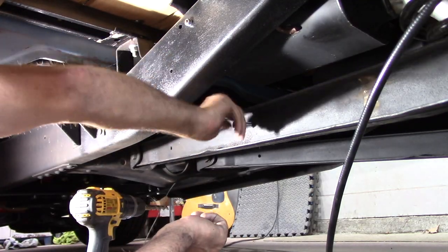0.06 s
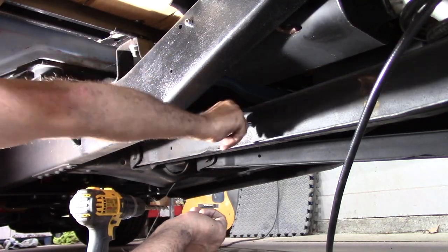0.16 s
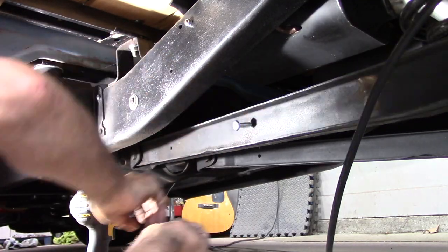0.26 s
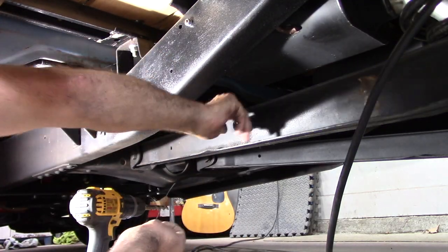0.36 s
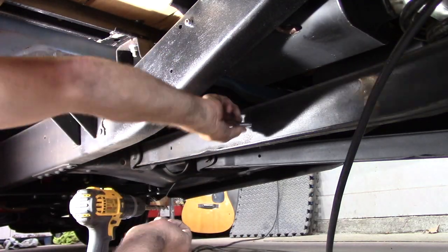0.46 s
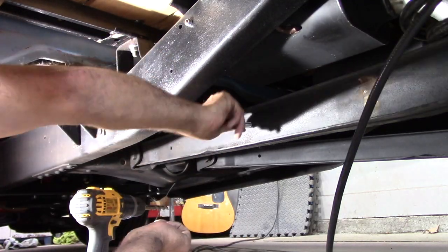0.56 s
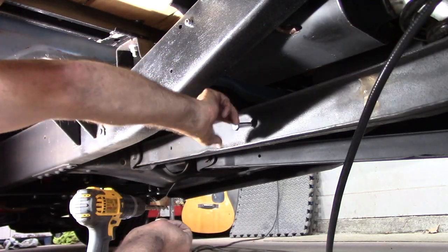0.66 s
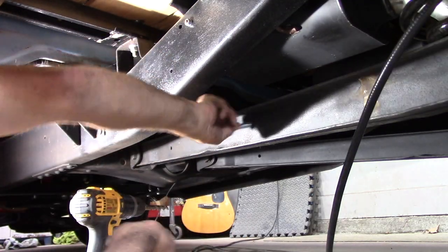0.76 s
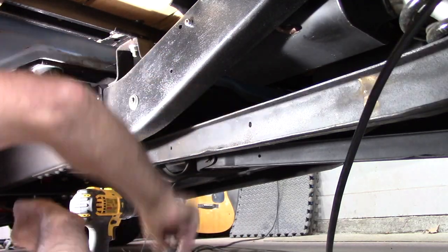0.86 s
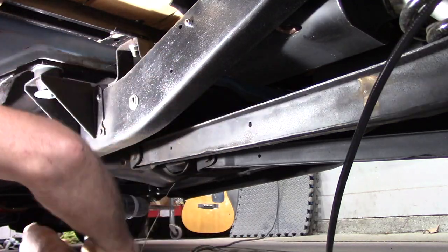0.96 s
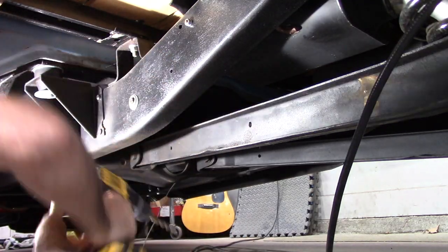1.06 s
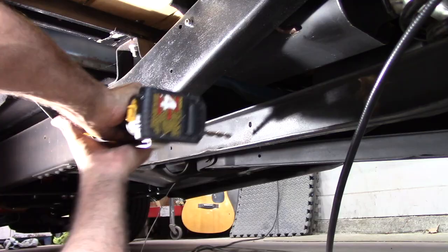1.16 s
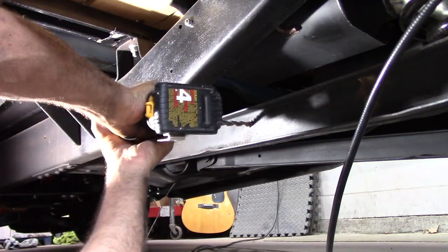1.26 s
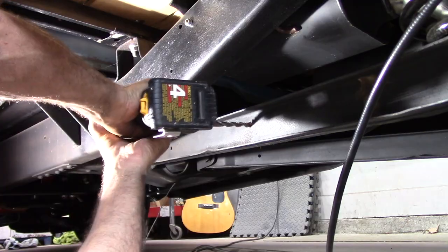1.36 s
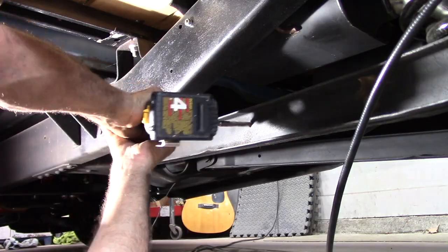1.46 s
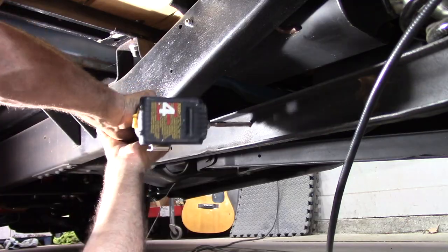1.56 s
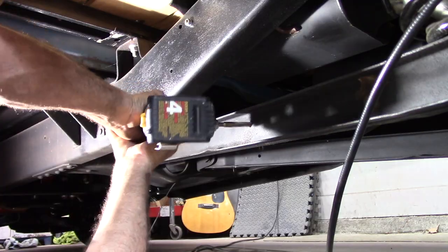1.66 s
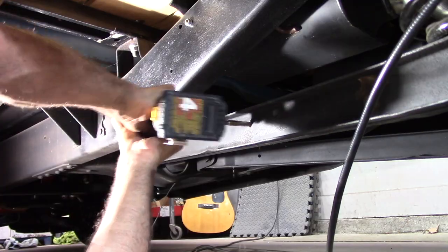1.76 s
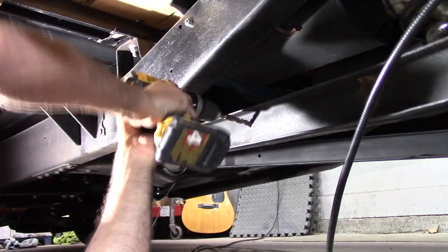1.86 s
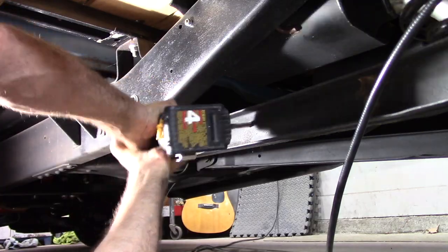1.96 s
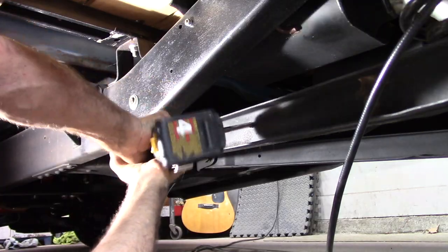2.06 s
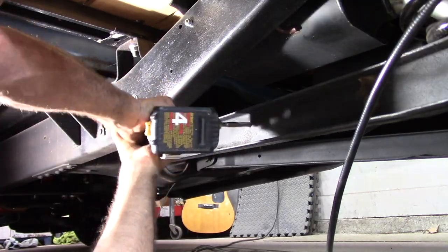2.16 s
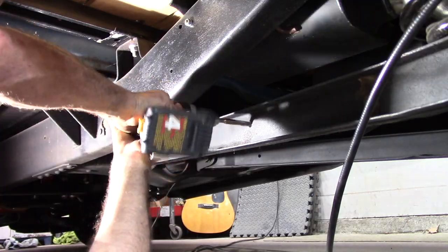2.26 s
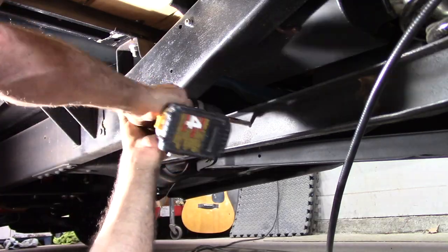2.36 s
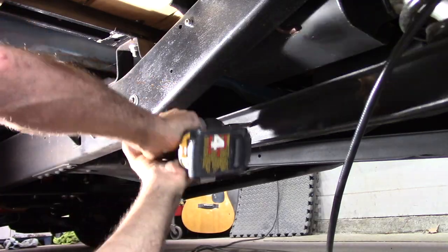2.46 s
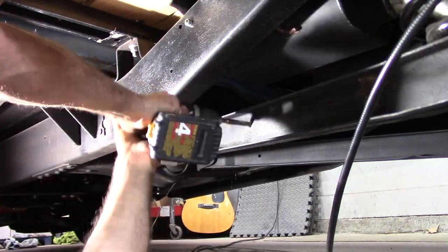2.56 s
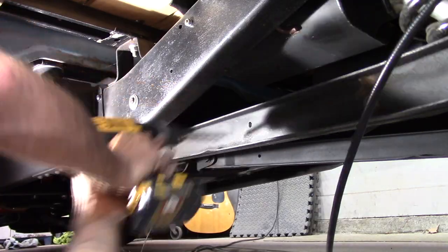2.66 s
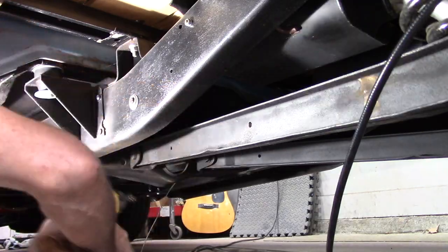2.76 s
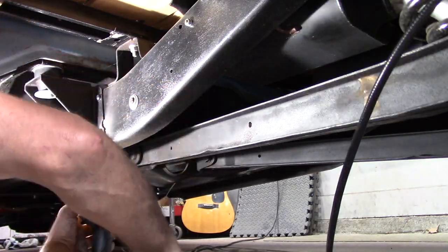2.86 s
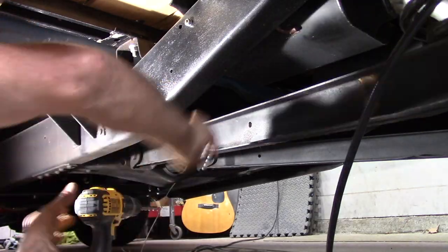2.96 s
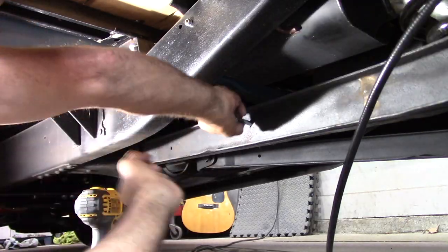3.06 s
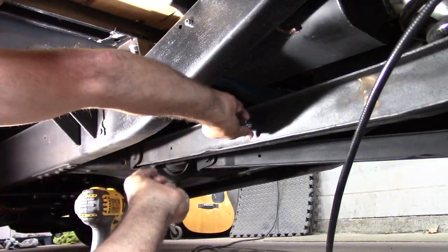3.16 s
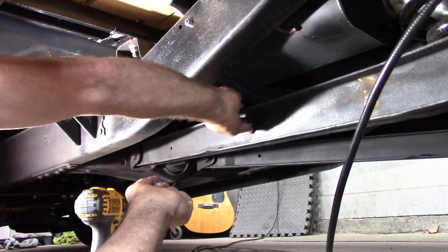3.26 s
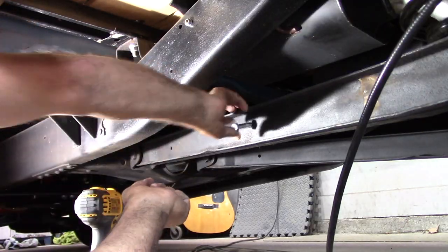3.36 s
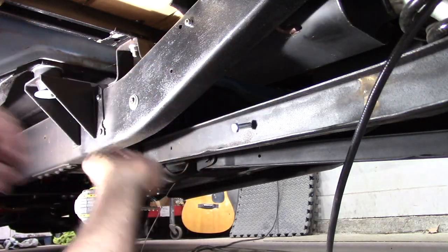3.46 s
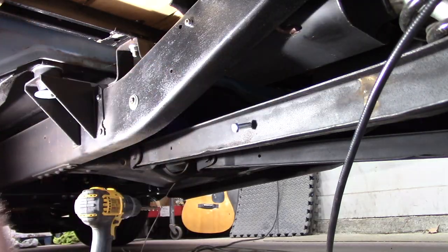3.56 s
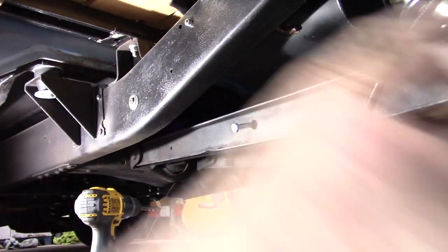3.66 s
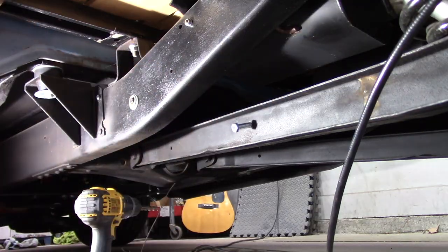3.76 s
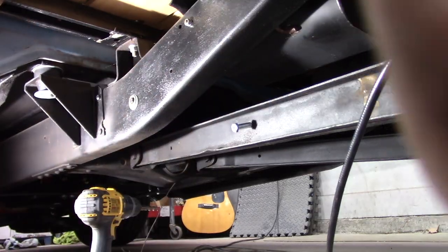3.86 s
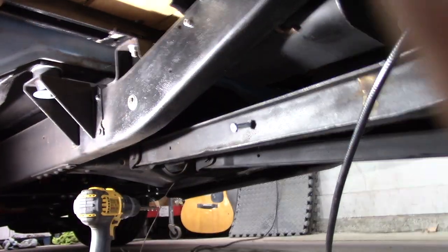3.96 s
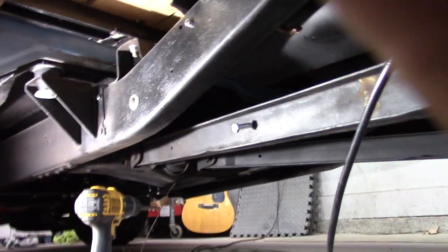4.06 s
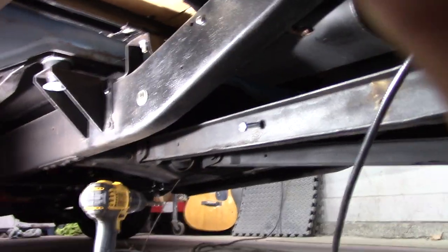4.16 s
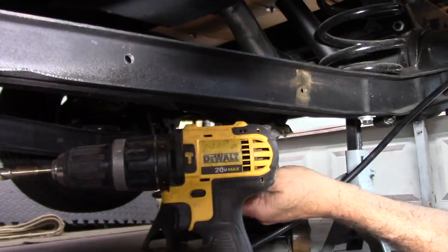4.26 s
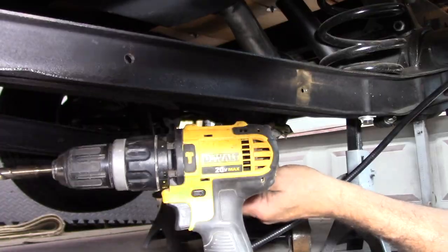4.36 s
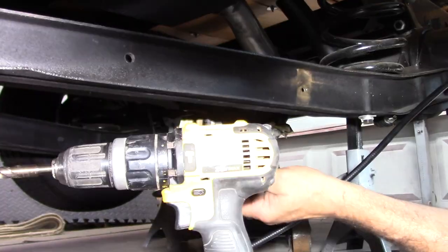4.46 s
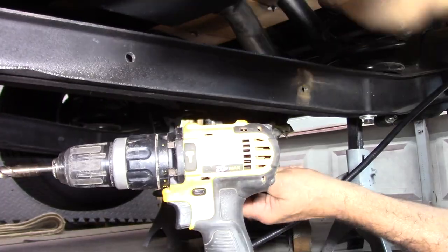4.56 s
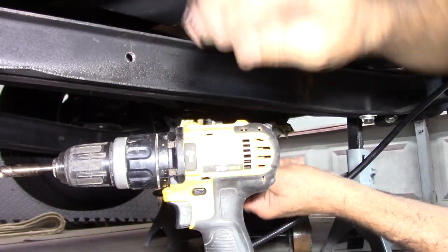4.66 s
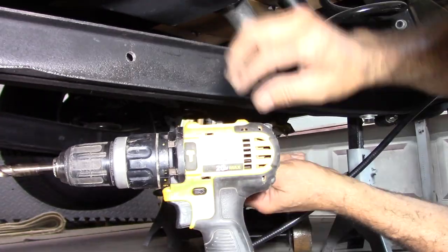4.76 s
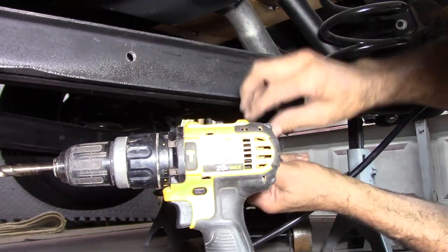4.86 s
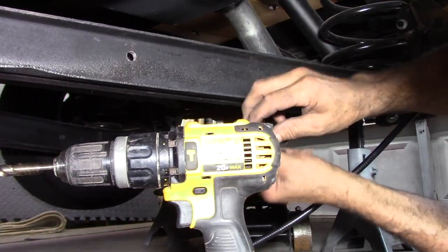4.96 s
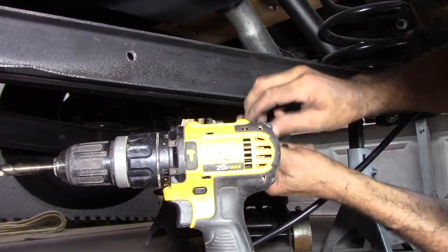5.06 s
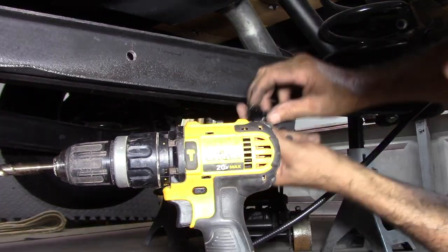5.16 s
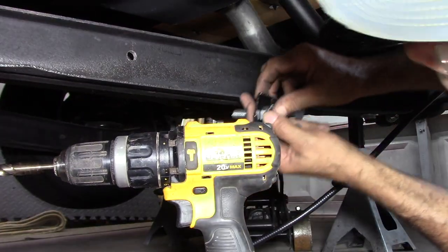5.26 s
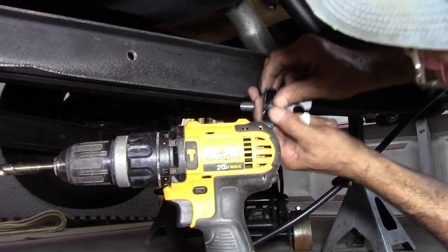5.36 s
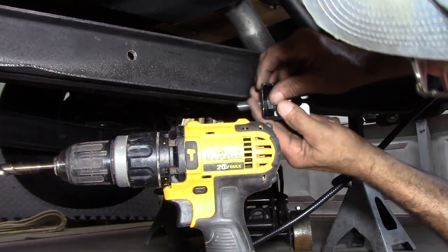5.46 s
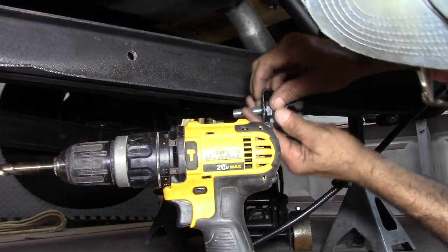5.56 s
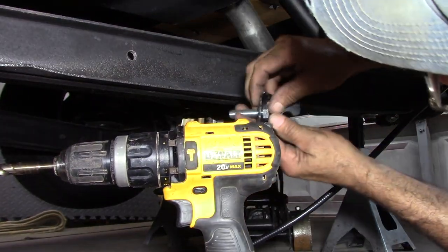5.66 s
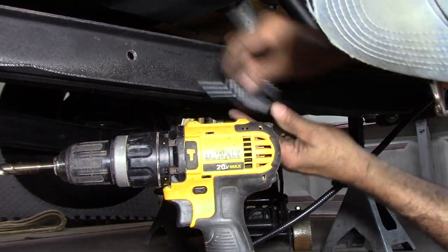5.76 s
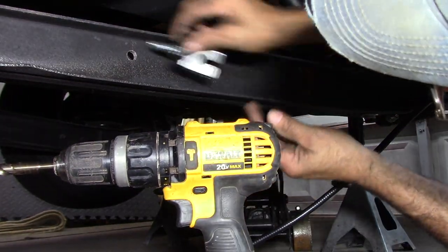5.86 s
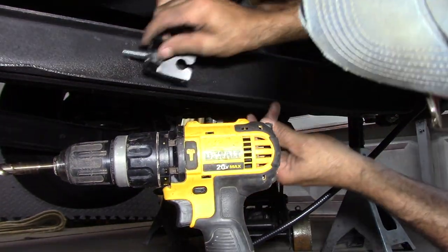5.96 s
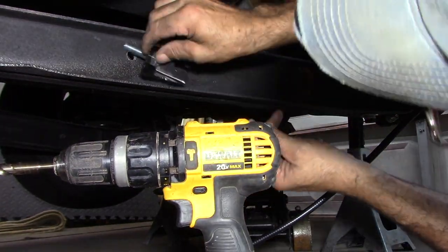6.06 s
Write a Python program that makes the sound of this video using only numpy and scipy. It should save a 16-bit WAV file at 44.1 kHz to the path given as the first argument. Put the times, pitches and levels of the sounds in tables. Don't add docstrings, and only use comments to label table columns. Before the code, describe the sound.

Sped-up, high-pitched drill screeches into a steel rail in two bursts between bolt rattles, then normal-speed fan hum, small clicks and a loud metal clank.

```python
import sys
import numpy as np
from scipy import signal
from scipy.fft import rfft, irfft, next_fast_len
from scipy.io import wavfile
from scipy.ndimage import uniform_filter1d, map_coordinates

SR = 44100
rng = np.random.default_rng(int(sys.argv[2]) if len(sys.argv) > 2 else 0)


def materialize(psi):
    bounded = np.clip(np.atleast_2d(psi).T, -1, 1)
    quanta = np.round(bounded * 32767).astype(np.int16)
    wavfile.write(sys.argv[1], SR, quanta)


def voltage_ratio(level):
    return 10 ** (np.asarray(level, float) / 20)


N = 269892

FAST_END_S, SLOW_START_S = 4.307, 4.316
# full cut in seconds, let go in seconds, cutting level in dB,
# rise in dB per second, fall in dB per second.
BURSTS = [
    (1.448, 1.865, -12.5, 900, 386),
    (1.975, 2.72, -13, 483, 999.5),
]


def unit(x):
    return x / np.sqrt(np.mean(x ** 2) + 1e-20)


def along(points, hz):
    f, v = np.transpose(points)
    return np.interp(np.log(hz + 1), np.log(f + 1), v)


def wobble(rate):
    knots = rng.standard_normal(int(N * rate / SR) + 4)
    return map_coordinates(knots, [np.arange(N) * rate / SR])


def swells(rows, column=1, as_gain=True):
    ms = np.arange(0, N / SR, 1 / 1000)
    total = 0
    for row in rows:
        height = voltage_ratio(row[column]) if as_gain else row[column]
        total = total + height * np.exp(-((ms - row[0]) / row[-1]) ** 2)
    return np.interp(np.arange(N) / SR, ms, total)


def filtered(x, response):
    m = next_fast_len(N + SR // 2)
    return irfft(rfft(x, m) * response(np.fft.rfftfreq(m, 1 / SR)), m)[..., :N]


def mode(f, hz, width):
    return 1j * f * width / (hz * hz - f * f + 1j * f * width + 1e-9)


def peaks(f, modes):
    return 1 + sum((voltage_ratio(db) - 1) * mode(f, hz, width) for hz, width, db in modes)


def band(f, lo_hz, hi_hz):
    return signal.freqs(*signal.butter(3, [lo_hz, hi_hz], "band", analog=True), f)[1]


def tone(hz, gain, blur, flutter_db):
    strength = np.sqrt(2) * gain * voltage_ratio(flutter_db * wobble(39.95))
    return strength * np.sin(2 * np.pi * np.cumsum(hz) / SR + blur * wobble(120))


def strike(s, db, modes):
    out, start = np.zeros(N), round(s * SR)
    t = np.arange(min(N - start, SR // 3)) / SR
    ring = 0
    for hz, level, t60 in modes:
        walk = uniform_filter1d(np.cumsum(rng.standard_normal(len(t))), size=14)
        rattle = 0.065 * np.sqrt(hz / 3000) * walk
        decay = voltage_ratio(db + level + rng.normal(0, 1.9) - 60 * t / t60)
        ring = ring + decay * np.sin(2 * np.pi * hz * t + rattle)
    out[start:][:len(t)] = ring * (1 - np.exp(-t / 0.00071))
    return out


def wandering(x, colour, modes, rate, flare_db):
    def paths(f):
        resonances = [(voltage_ratio(db) - 1) * mode(f, hz, width) for hz, width, db in modes]
        return colour(f) * np.array([1 + 0 * f] + resonances)
    parts = filtered(x, paths)
    return unit(parts[0] + sum(voltage_ratio(flare_db * wobble(rate)) * part for part in parts[1:]))


def motor_hz(slip_db):
    # trigger pulled in seconds, gear mesh then in Hz, run-up in seconds, released in seconds,
    # braking in seconds.
    trigger = [
        (1.44, 5840, .19, 1.872, .008),
        (1.944, 7700, 0.044, 2.695, 0.041),
    ]
    knee_hz, knee_share = 10860, 0.59
    run_up_hz, steady_hz, coast_hz, settle_s = 11610, 11730, 8000, 0.025
    path = []
    for pull, hz, run, release, brake in trigger:
        path += [(pull, hz), (pull + knee_share * run, knee_hz), (pull + run, run_up_hz)]
        path += [(pull + run + settle_s, steady_hz), (release, steady_hz), (release + brake, coast_hz)]
    s, hz = np.transpose(path)
    drag_hz_per_db = 40
    return np.interp(np.arange(N) / SR, s, hz) + drag_hz_per_db * uniform_filter1d(slip_db, size=2000)


def drill():
    # time in seconds, cutting gained in dB, half length in seconds.
    slips = [(1.45, -3, 0.073), (1.575, -2, 0.032), (1.63, -2.5, 0.012), (1.74, -2, .015),
             (1.817, -6.5, 0.018), (2.18, -5, 0.072), (2.172, 6, 0.0087), (2.29, 1, 0.036),
             (2.41, -2.5, 0.016), (2.45, 2, 0.03), (2.485, -9, 0.011), (2.575, 0, 0.019),
             (2.62, -5.5, 0.026), (2.69, -6.5, 0.063)]
    # time in seconds, rail boom in dB, bit chatter in dB, half length in seconds.
    bites = [(1.445, -25.5, -26, 0.021), (1.51, -38, -20, 0.012), (1.635, -26, -43, 0.082),
             (1.784, -53, -23, 0.022), (1.87, -31.5, -27, 0.037), (1.925, -27, -54, 0.048),
             (1.975, -35, -28, 0.021), (2.1, -41, -39.5, 0.14), (2.18, -31, -22, 0.047),
             (2.25, -34, -21, 0.029), (2.29, -32, -31, 0.021), (2.372, -36, -19, 0.07),
             (2.462, -43, -19, 0.03), (2.537, -55, -24, 0.014), (2.605, -55, -32.5, 0.013),
             (2.66, -52, -19, 0.016)]
    # frequency in Hz, density in dB per Hz.
    chip_colour = [(1060, -46), (1800, -10), (2180, -13), (3190, -9.5), (3620, -8.5), (4080, -3),
                   (5120, -3.5), (7570, -2), (11300, 0), (15800, -5.5)]
    # frequency in Hz, width in Hz, level over the noise in dB.
    rail_high = [(2810, 430, 7), (4726, 46, 9), (4980, 90, 10), (5236, 75, 9.5), (5840, 68.6, 9.5),
                 (6340, 156, 7.5), (6470, 60, 6.5), (6870, 120, 4), (8650, 100, 4), (9400, 77, 6.5),
                 (9800, 68, 7), (11200, 80, 6), (13400, 80, 2), (14600, 120, 9)]
    rail_low = [(351, 20, 18.7), (619, 35, 16), (740, 71, 12), (838, 30, 15), (900, 45, 14.8),
                (977, 110, 8.6), (1165, 67, 15.2), (1330, 18, 6.8), (1387, 40, 14), (1520, 38, 15),
                (1650, 40, 3.2)]
    # frequency in Hz, width in Hz, level in dB.
    bit_modes = [(3320, 19, -1), (3517, 240, 0), (3695, 70, -2)]
    # time in seconds, level in dB, half length in seconds.
    grinds = [(1.53, -35, .015), (1.7, -20, 0.024), (1.77, -21.5, .035), (1.86, -23, 0.016),
              (2.05, -24.5, .04), (2.17, -18, .01), (2.27, -20, 0.037), (2.33, -23, 0.025),
              (2.45, -18, 0.037), (2.53, -18, 0.032), (2.58, -18, 0.014)]
    # time in seconds, level
    # in dB, half length in seconds.
    drones = [(1.67, -20.5, 0.019), (1.75, -20.5, 0.059), (1.91, -19.5, 0.034), (1.97, -25.5, 0.037),
              (2.08, -27.5, 0.066), (2.19, -29.5, 0.031), (2.3, -28, 0.065), (2.48, -25, 0.051),
              (2.64, -26.5, 0.043), (3.43, -32, 0.03)]
    # time in seconds, level in dB, half length in seconds, frequency in Hz.
    hums = [(1.487, -19.5, 0.026, 845), (1.64, -27.5, 0.027, 840), (2.1, -30, 0.015, 835),
            (1.88, -30, 0.028, 890), (2.29, -25, 0.032, 835), (2.28, -29, 0.015, 1500),
            (2.45, -25, 0.021, 880), (2.67, -32, 0.034, 835), (1.63, -26.5, 0.034, 1700),
            (2.43, -27.5, 0.018, 1400)]
    # time in seconds, level in dB, half length in seconds.
    whines = [(1.48, -24, .02), (1.535, -27, .015), (1.6, -32, .015), (1.92, -36, .025), (1.985, -24, .03),
              (2.03, -27, .015), (2.22, -25, .04), (2.44, -28, .015), (2.67, -29, .025)]
    # time in seconds, level in dB, half length in seconds.
    sways = [
        (1.33, -46, 0.072),
        (2.72, -52.5, 0.15),
        (3.0, -52, 0.13),
        (3.3, -53, 0.12),
    ]

    t = np.arange(N) / SR
    slip_db = swells(slips, as_gain=False)
    press_db = np.max([db - rise * np.maximum(full - t, 0) - fall * np.maximum(t - off, 0)
                       for full, off, db, rise, fall in BURSTS], axis=0)
    cut_db, mesh_hz = press_db + slip_db, motor_hz(slip_db)
    turn = np.cumsum(mesh_hz) / SR
    flutes = 1 + 0.1 * np.sin(2 * np.pi * turn / 34 + 1.1 * wobble(30))
    chip_size = voltage_ratio(0.81 * wobble(2500) + 1.1 * wobble(900) + 0.65 * wobble(44.83))
    chips = rng.standard_normal(N) * chip_size * flutes

    z = signal.stft(chips, nperseg=1024)[2]
    flare = uniform_filter1d(rng.standard_normal(z.shape), size=2, axis=0)
    flare = uniform_filter1d(flare, size=4, axis=1)
    chips = signal.istft(z * voltage_ratio(1.2 * unit(flare)), nperseg=1024)[1][:N]
    cutting = wandering(chips, lambda f: voltage_ratio(along(chip_colour, f)), rail_high, rate=28, flare_db=2.4)
    grind = unit(filtered(np.roll(chips, SR), lambda f: band(f, 4600, 6900) * peaks(f, rail_high)))
    chatter = unit(filtered(chips, lambda f: sum(voltage_ratio(db) * mode(f, hz, width) for hz, width, db in bit_modes)))

    thrust = rng.standard_normal(N) * voltage_ratio(0.66 * wobble(25.4))
    boom = wandering(thrust, lambda f: band(f, 485, 2500), rail_low, rate=22, flare_db=1.8)
    shake = unit(filtered(thrust, lambda f: band(f, 20, 298)))
    drone = np.sqrt(2) * np.sin(2 * np.pi * 550 * t + 1.2 * wobble(30)) * voltage_ratio(3 * wobble(35) - 2)
    whine_gain = voltage_ratio(press_db + 10 - 35) + swells(whines)
    whine = tone(mesh_hz, whine_gain, blur=1.2, flutter_db=2.5)
    hum = sum(tone(np.full(N, hz), swells([row]), blur=0.21, flutter_db=-0.3) for *row, hz in hums)
    sway = tone(np.full(N, 357), swells(sways), blur=1.4, flutter_db=1.0)

    boom_gain = voltage_ratio(press_db + 0.46 * slip_db - 14.5) + swells(bites)
    chatter_gain = voltage_ratio(-6.5) * (voltage_ratio(cut_db - 13.5) + swells(bites, column=2))
    out = voltage_ratio(cut_db) * cutting + boom_gain * boom + chatter_gain * chatter
    out = out + voltage_ratio(-3.0) * swells(drones) * drone + swells(grinds) * grind
    return out + voltage_ratio(cut_db - 59.5) * shake + whine + hum + sway


def contacts(rows, gain_db, grit_db, rise, tail_db):
    drive = np.zeros((4, N + SR))
    t = np.arange(-SR // 20, SR // 5) / SR
    t60 = np.array([[.22], [.15], [.14], [.11]])
    tail = voltage_ratio(tail_db - 60 * np.maximum(t, 0) / t60)
    for s, db, weight_db, sizzle_db, length in rows:
        length = np.clip(length, .001, .04)
        swell = np.exp(-(t / (rise * length)) ** 2)
        shape = np.where(t < 0, swell, np.maximum(np.exp(-(t / length) ** 2), tail))
        grit = voltage_ratio(grit_db * np.repeat(rng.standard_normal(len(t) // 32 + 1), 32)[:len(t)])
        level = voltage_ratio(db + gain_db + np.array([[weight_db - 1], [weight_db], [0], [sizzle_db]]))
        drive[:, round(s * SR):][:, :len(t)] += level * shape * grit * rng.standard_normal((4, len(t)))
    return drive[:, SR // 20:][:, :N]


def ringing(f, modes, over_db, damping, shift):
    rings = sum(voltage_ratio(db) * mode(f, shift * hz, damping * np.log(1000) / np.pi / t60) for hz, db, t60 in modes)
    return 1 + voltage_ratio(over_db) * rings


def through_steel(drive, ring_db, shift=1):
    # frequency in Hz, level in dB, t60 in seconds.
    rail_ring = [(871, -3.5, 0.28), (1368, -8, 0.14), (1487, -8, 0.24), (1189, -8, 0.17),
                 (2345, -15.5, 0.073), (2430, -11.5, 0.093), (2710, -3, 0.049), (3055, -10, 0.14),
                 (3220, -34, 0.052), (3490, -6, 0.053), (3660, -12.5, 0.033), (3600, -28, 0.05)]
    bolt_ring = [(4866, 4, 0.098), (4930, -5, 0.14), (5480, -7, 0.069), (5890, 3, 0.21), (6530, -14, 0.086),
                 (6550, -20.5, 0.081), (7210, -7, 0.12), (7500, -9, 0.088), (9000, -8.5, 0.12),
                 (9900, -6, 0.07), (10900, -3.5, 0.094), (12320, -27, 0.11), (13890, -21, 0.15),
                 (15260, -18, 0.096)]

    def paths(f):
        boom = voltage_ratio(7.5) * band(f, 810, 1820) * ringing(f, rail_ring, 17.0 + ring_db, 1.6, shift)
        body = band(f, 2250, 4200) * ringing(f, rail_ring, 15.0 + ring_db, 0.82, shift)
        ring = voltage_ratio(-3.5) * band(f, 3760, 7430) * ringing(f, bolt_ring, 9.0 + ring_db, 2.9, shift)
        sizzle = voltage_ratio(1.5) * band(f, 7950, 17900) * ringing(f, bolt_ring, 10.5 + ring_db, 4.3, shift)
        return [boom, body, ring, sizzle]
    return filtered(drive, paths).sum(axis=0)


def handling():
    # time in seconds, ring in dB, weight passed to the rail in dB,
    # sizzle in dB.
    knock_rows = [(0.18, -15, -9.5, -13.5), (0.0418, -22, -6, -4), (0.497, -21.5, -6, -20.5),
                  (0.524, -23.5, 1, -12), (0.636, -23, -8, -10), (0.6547, -15, 0, 0.5),
                  (0.8205, -13.5, -10, 3), (0.8609, 2.5, -23, -5.5), (1.2795, -14, 0, -8.5),
                  (1.287, -28, -5, -18.5), (1.3415, -9.5, 0.5, -12.5), (1.354, -23, 9, -20),
                  (1.368, -33, 8.5, -19), (1.384, -31, 11, -15), (1.426, -15, -10, -3),
                  (2.7153, -26, -18, 0), (2.723, -28.5, -10, -5), (2.819, -14.5, -5.5, -12.5),
                  (2.8265, -26, -5, 4), (2.874, -29, 6.5, -14), (3.08, -4, -16, -22), (3.114, -8, -14, 0.5),
                  (3.132, -4.5, -14, -7.5), (3.1646, -21, -9, -7), (3.1872, -8.5, -6, -4),
                  (3.271, -6, -25, -9), (3.279, -10, -15, 1), (3.326, -10.5, -5, -5), (3.3328, -9, -13, -5),
                  (3.337, -7.5, -10, -5), (3.389, -19, 0.5, -19)]
    # peak in seconds, ring in dB, weight in dB, sizzle in dB,
    # length in seconds.
    scrapes = [(.048, -21, -3, -11.5, 0.011), (.186, -37.5, -8, -4, 0.0066), (.654, -22, -6, -1.5, 0.012),
               (.678, -23, 0, -5.5, 0.0088), (.812, -21, -5, -3.5, 0.01), (.826, -16.5, -15, -0.2, 0.0099),
               (1.289, -18.5, 6.5, -25.5, 0.0086), (1.337, -27, 4.5, -10, 0.005),
               (1.352, -21, 9.5, -23, 0.014), (2.714, -22.5, -11, 10, 0.011), (2.83, -33, -4, -2, 0.0078),
               (3.103, -19, -1, -20, 0.011), (3.172, -15, -6.5, -5.5, 0.015), (3.208, -19, -4, -2, 0.0095),
               (3.29, -7.5, -7.5, -7, 0.015), (3.348, -8, -2, 0, 0.0097),
               (3.361, -15.5, -1.5, -1.5, 0.0081), (3.395, -39, 3, -16, 0.04), (3.997, -28.5, 0, -1, .009)]
    # time in seconds, ring in dB, sizzle in dB.
    tick_rows = [(0.9577, -20, 1), (0.972, -23, 4), (1.043, -36, -2), (1.079, -39, 1), (1.0916, -32, 3),
                 (1.1244, -29.5, -4), (3.8262, -26, -8), (3.9094, -27, -9), (3.994, -22, -7),
                 (4.004, -25, -8), (4.025, -28, -5.5), (4.082, -26, -8), (4.126, -24, -8), (4.045, -22, -6),
                 (4.057, -16, -5.5), (4.219, -14.5, -7.5), (4.2314, -27, -3.5), (4.279, -7, -12)]
    # time in seconds, peak in dB.
    snaps = [(1.437, -3), (1.4473, -6), (1.5257, 5.5), (1.6534, -3), (1.6843, -10), (1.7496, 0),
             (1.7716, 3), (1.8454, -15.5), (1.9392, -7), (1.9582, -4.5), (1.969, -6), (2.015, -2.5),
             (2.025, 5.5), (2.1428, 0), (2.168, 0), (2.244, -3), (2.2545, -2), (2.2884, -4.5),
             (2.3655, 7.5), (2.4176, -4), (2.446, 3), (2.4945, -13), (2.5044, -10), (2.5543, -5),
             (2.6436, -1), (2.716, -8)]
    # time in seconds, level in dB, then modes as
    # frequency in Hz, level in dB, t60 in seconds; the next three tables are alike.
    clanks = [
        (1.2797, -14, [(888, -9, .1), (1378, 1.5, 0.072), (1544, -1, .07), (1610, -5, .075), (2570, -12, .08), (2760, -1, .05), (3214, -10, .05), (3700, 5, .03), (4037, -3, .07), (5146, -4, .035), (5200, -14, .12)]),
        (1.3412, -16, [(900, -9, 0.12), (1386, 2, 0.079), (1510, -1, 0.14), (2552, -8, .07), (2900, -3, .04), (3500, -1, .03), (3980, -10, .06), (5140, -8, .04), (5895, -12, .05), (6400, -1, .04), (7251, -10, .04)]),
        (3.0785, -17.5, [(2900, -10, .05), (3700, -4, .05), (4970, -1, .05), (5970, -11, .038), (6480, -6, .04)]),
        (3.1315, -22, [(4533, -1, .055), (5000, 0, .045), (6444, -3, .038), (3800, -6, .04)]),
        (3.272, -18, [(1770, -3, .06), (3750, -2, 0.1), (4070, -9.5, .08), (4942, -3, .07), (5846, -6, .1), (6240, -5, .08)]),
        (3.282, -18, [(1372, 0, 0.17)]),
        (3.3268, -16, [(2720, -8, .07), (3800, -6, .05), (4530, -3, .1), (5000, -1, .07), (5800, -1, .07), (6300, -6, .1)]),
        (3.344, -24, [(1384, 0, .12), (1900, -2, .1), (3300, 2, 0.12)]),
    ]
    pings = [
        (3.8262, -29, [(7400, -2, 0.034)]),
        (4.082, -31, [(7450, 2, .03)]),
        (1.8, -31, [(5700, 0, .04)]),
    ]
    set_down = (2.8196, -19.5, [(2230, 2.5, 0.045), (2450, -6, 0.05), (2900, -4, .02)])
    clack = (4.279, -12.5, [(5170, -4, 0.012), (6840, 2.5, 0.012), (8000, 1, 0.011), (9400, 2.5, 0.013)])

    knocks = [(*row, 0.01) for row in knock_rows]
    tick_s, tick_weight_db = 0.0021, -15.5
    ticks = [(s, db, tick_weight_db, sizzle_db, tick_s) for s, db, sizzle_db in tick_rows]
    ticks += [(s, db - 8, tick_weight_db, -2, tick_s) for s, db in snaps]
    firm = []
    for k in range(2):
        hits = contacts(knocks[k::2], -5.5, grit_db=-0.7, rise=0.087, tail_db=-5.5)
        firm.append(hits + contacts(scrapes[k::2], -4.5, grit_db=2.0, rise=1.0, tail_db=-5.0))
    light = contacts(ticks, -.5, grit_db=0, rise=0.1, tail_db=-30)
    blows = sum(strike(*blow) for blow in clanks + pings) + strike(*set_down) + strike(*clack)
    out = filtered(blows, lambda f: band(f, 360, 12000))
    out = out + through_steel(firm[0], ring_db=1.5)
    out = out + through_steel(firm[1], ring_db=-3.5, shift=1.045)
    out = out + through_steel(light, ring_db=-14.5)
    return out * (np.arange(N) < FAST_END_S * SR)


def clamp():
    # time in seconds, peak in dB.
    clicks = [
        (5.3057, -22),
        (5.605, -20.5),
    ]
    # frequency in Hz, level in dB, t60 in seconds.
    part = [(2420, -2.5, 0.053), (2690, -3, 0.067), (2900, 0, 0.033), (3400, 3, 0.028), (3720, 7.5, 0.024),
            (3960, -5, 0.11), (6420, -15, 0.12), (11000, -16, 0.071)]
    # time in seconds, level in dB, modes as frequency in Hz, level in dB, t60 in seconds.
    bump = (5.915, -24, [(104.6, -3.5, 0.51), (158, -0.5, 0.29)])
    # time in seconds, level in dB, t60 in seconds, thud in dB.
    drops = [
        (6.0027, -7.5, 0.18, -37),
        (6.009, -19.5, .1, -20),
        (6.03, -23, 0.57, 0),
        (6.05, -22, 0.18, 6),
        (6.064, -27, .15, 4),
        (6.094, -34, 0.25, 9.5),
    ]
    # frequency in Hz, level in dB, t60 in seconds.
    clamp_modes = [(1170, -14, 0.4), (1460, -8, 0.12), (1593, 1, 0.28), (2018, -3, .6), (2160, -4.5, 0.6),
                   (2390, -1, 0.35), (2590, -5, .5), (3040, -13, 0.22), (3768, 0, 0.14), (4300, -2, .12),
                   (4651, -5.5, 0.5), (5110, -9, .7), (5340, 16, 0.023), (5701, -9, 0.12)]
    thud = [(474, 1, 0.14), (604, -9, 0.15), (650, -10, 0.72), (888, -5, 0.26)]
    # frequency in Hz, density in dB per Hz.
    clang = [(88, -51), (150, -40), (500, -10.5), (801, -9.5), (1250, -1), (1590, 3), (2000, -4),
             (4370, -0.5), (6500, -13), (10500, -31.5), (14000, -72)]

    t = np.arange(N) / SR
    out = strike(*bump) * np.clip((t - bump[0]) / 0.012, 0, 1)
    shake = 0
    for s, db in clicks:
        out = out + strike(s, db - 12.0, part)
        shake = shake + voltage_ratio(db - 16 - 60 * np.abs(t - s) / 0.04) * (t >= s)
    for s, db, t60, thud_db in drops:
        out = out + strike(s, db - 10.0, clamp_modes) + strike(s, db + thud_db - 3.0, thud)
        shake = shake + voltage_ratio(db - 60 * np.abs(t - s) / t60) * np.clip((t - s) / 0.0008, 0, 1)
    noise = rng.standard_normal(N)
    colour = lambda f: voltage_ratio(along(clang, f))
    return out + voltage_ratio(-1.0) * filtered(shake * noise, colour) / np.std(filtered(noise, colour))


def rustle():
    # time in seconds, level in dB, low edge in Hz, high edge in Hz, half length in seconds.
    brushes = [
        (5.78, -45.5, 1650, 3800, 0.23),
        (4.15, -47, 7800, 10800, 0.25),
        (5.794, -47, 720, 7600, 0.17),
    ]
    out = 0
    for row in brushes:
        hiss = unit(filtered(rng.standard_normal(N), lambda f: band(f, row[2], row[3])))
        out = out + swells([row]) * voltage_ratio(1.4 * wobble(150)) * hiss
    return out


def fan_pair(colour, split_hz, drone_db, air_db):
    high = lambda f: 1 / (1 + (split_hz / (f + 1)) ** 4)
    parts = filtered(rng.standard_normal((2, N)), lambda f: colour(f) * np.sqrt([1 - high(f), high(f)]))
    return voltage_ratio(drone_db) * unit(parts[0]) + voltage_ratio(air_db + .9 * wobble(12)) * unit(parts[1])


def fan():
    # frequency in Hz, density in dB per Hz.
    fan_colour = [(12, -66.5), (20, -37.5), (116, -11.5), (308, -5.5), (375, -3), (482, -10.5), (620, -11),
                  (969, -17), (1600, -19.5), (1890, -22), (2370, -24), (7230, -36.5), (11500, -51.5),
                  (15800, -65)]
    # frequency in Hz, width in Hz, level in dB.
    room_fast = [(500, 12, 13), (693, 13.3, 12.2), (949, 78, 9.1), (1600, 110, 2.7), (1797, 130, 9.4),
                 (2660, 28, 5.9), (2910, 85, 7.9), (3800, 46, 5), (4160, 28, 4), (4530, 50, 5),
                 (6630, 13, 14)]
    room_slow = [(121.4, 7.9, 5.9), (189, 13, 6.1), (226, 11, 5.1), (380.8, 5.9, 9.3), (437, 4.8, 12.4),
                 (512, 41, 5.7), (1630, 23, 3.1), (1880, 5.5, 14), (2490, 6.2, 10)]

    t = np.arange(N) / SR
    recover = np.exp(-np.maximum(t - BURSTS[-1][1], 0) / 0.11)
    duck_db = -9 * (t > BURSTS[0][0]) * recover
    low_cut = lambda f: 1 / (1 + (170 / (f + 1)) ** 4)
    fast_colour = lambda f: voltage_ratio(along(fan_colour, f / 4)) * peaks(f, room_fast) * low_cut(f)
    slow_colour = lambda f: voltage_ratio(along(fan_colour, f)) * peaks(f, room_slow) / (1 + (45 / (f + 1)) ** 2)
    fast = fan_pair(fast_colour, 2920, drone_db=-31.5 + duck_db, air_db=-38.5 + duck_db)
    slow = fan_pair(slow_colour, 1460, drone_db=-31.5, air_db=-44)
    rumble = voltage_ratio(-90 + 3 * wobble(4.5)) * unit(filtered(rng.standard_normal(N), lambda f: band(f, 9.8, 150)))
    fade_in = np.clip((t - FAST_END_S) / (SLOW_START_S - FAST_END_S), 0, 1) ** 3
    return (fast + rumble) * (t < FAST_END_S) + voltage_ratio(.5 * wobble(4.03)) * fade_in * slow


def scene():
    # frequency in Hz, side minus mid in dB.
    side_colour = [(60, -24), (110, -20), (200, -25), (380, -26.5), (1290, -31.5), (4400, -27.5),
                   (8120, -27), (15000, -26)]
    steady, hands, drop = fan() + drill(), handling(), clamp()
    t = np.arange(N) / SR
    cloth = rustle() * (np.abs(t - FAST_END_S - .3) > .3)
    late = np.roll(steady + voltage_ratio(-1.0) * hands, 40)
    side = filtered(late, lambda f: voltage_ratio(along(side_colour, f) - 1.5))
    side = side + 0.0027 * steady + 0.06 * drop + np.where(t < FAST_END_S, .3, .03) * cloth
    mid = steady + hands + drop + cloth
    return np.array([mid + side, mid - side])


def band_limit(x):
    return signal.sosfilt(signal.butter(12, 16960, fs=SR, output="sos"), x)


def record(dry):
    x = dry / (1 + np.abs(dry / .81) ** 6) ** (1 / 6)
    slope = lambda f: 1 / (1 + np.exp(np.clip((f - 15780) / 40, -50, 50)))
    mix = filtered(x, lambda f: (voltage_ratio(-42.0) + slope(f)) * (f < 16950))
    return band_limit(mix)


dry = scene()
out = record(dry)
materialize(out)
```